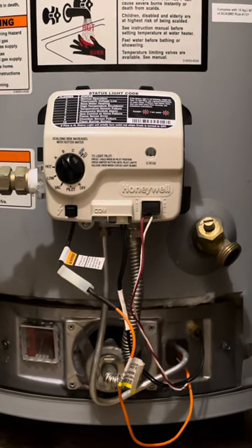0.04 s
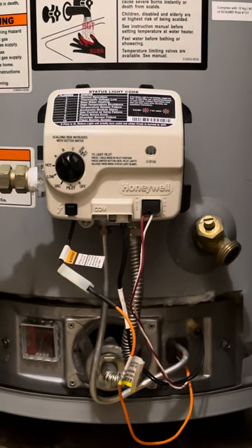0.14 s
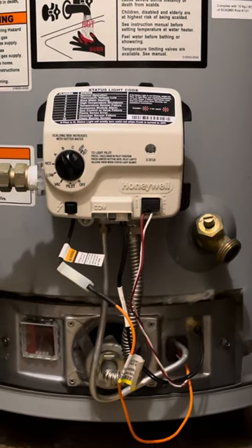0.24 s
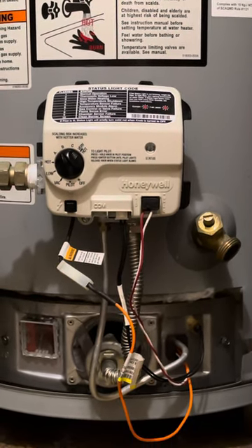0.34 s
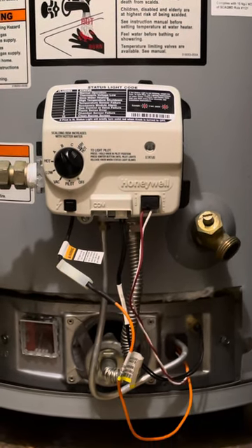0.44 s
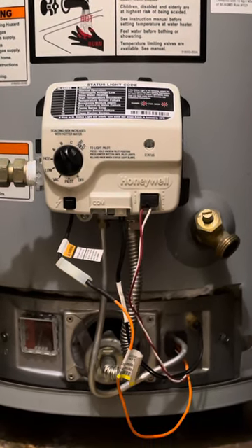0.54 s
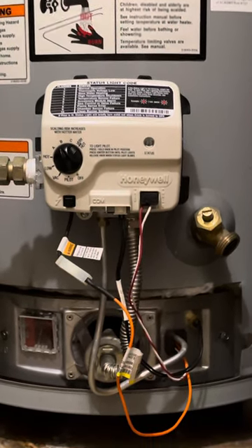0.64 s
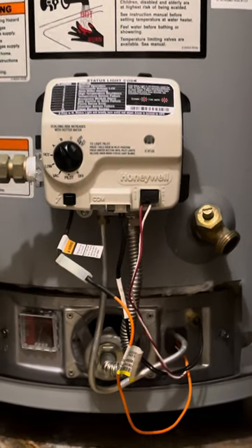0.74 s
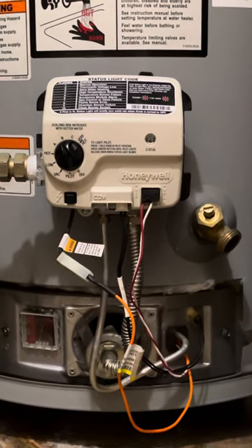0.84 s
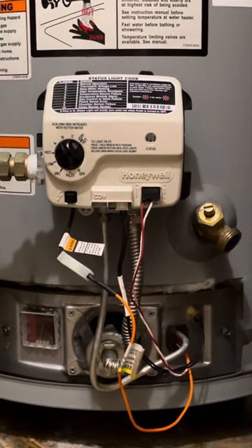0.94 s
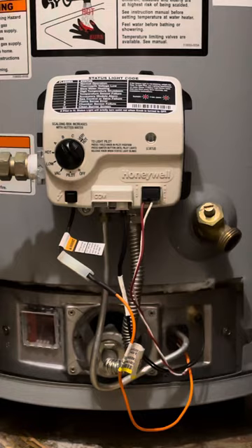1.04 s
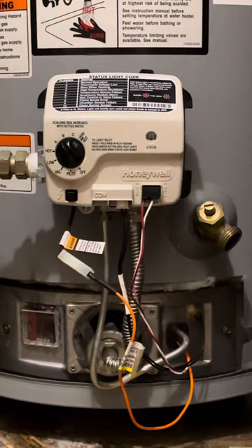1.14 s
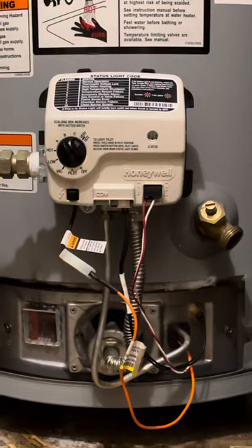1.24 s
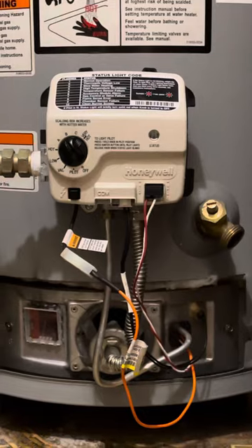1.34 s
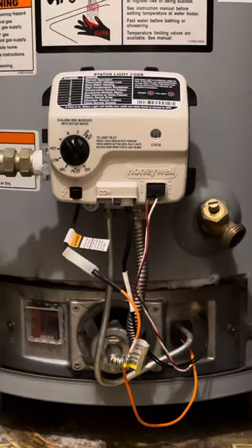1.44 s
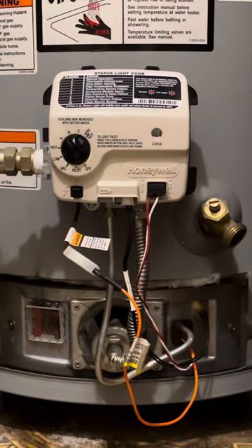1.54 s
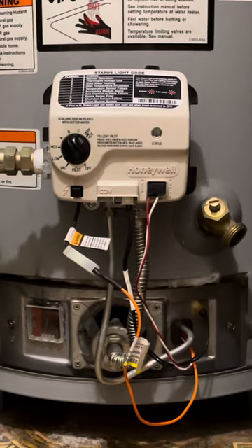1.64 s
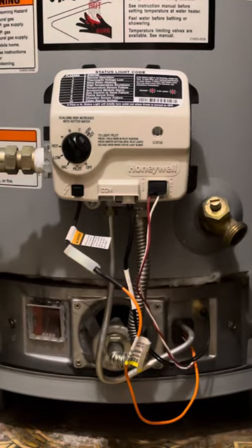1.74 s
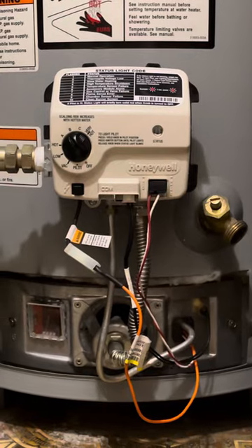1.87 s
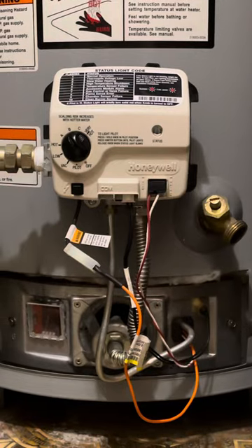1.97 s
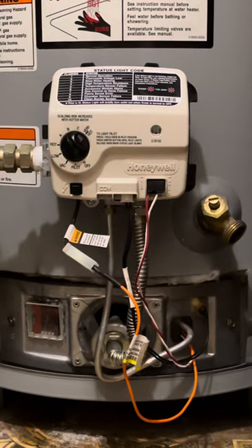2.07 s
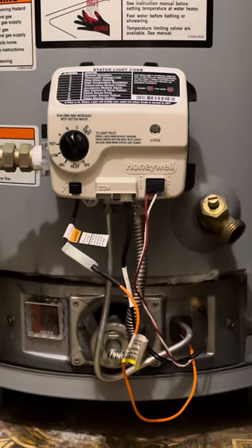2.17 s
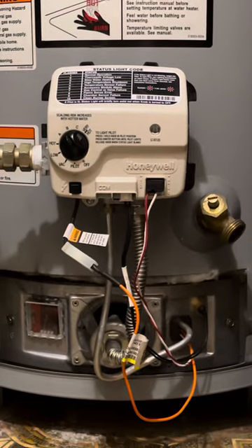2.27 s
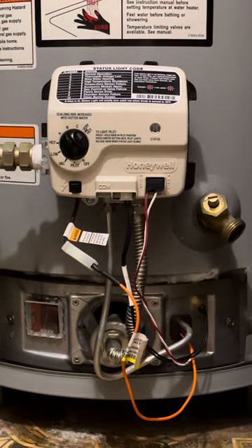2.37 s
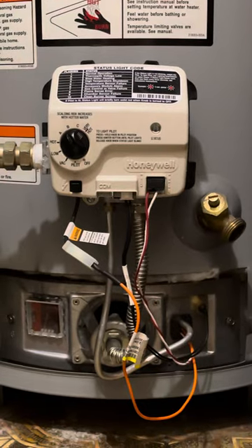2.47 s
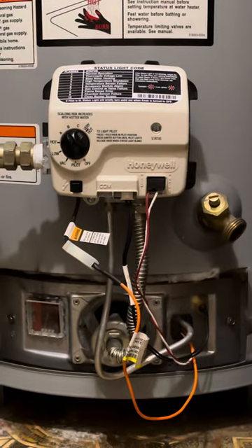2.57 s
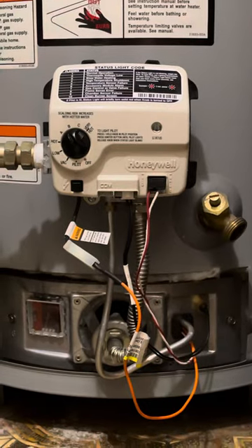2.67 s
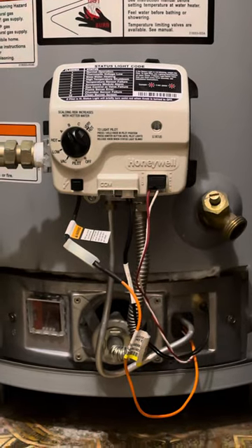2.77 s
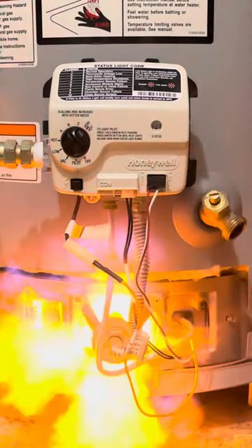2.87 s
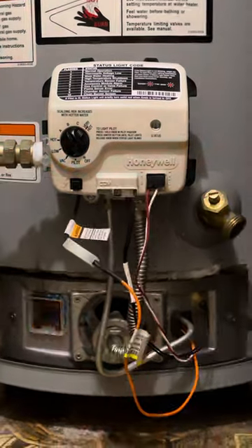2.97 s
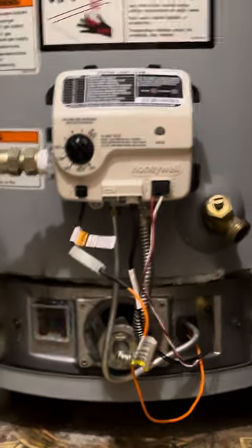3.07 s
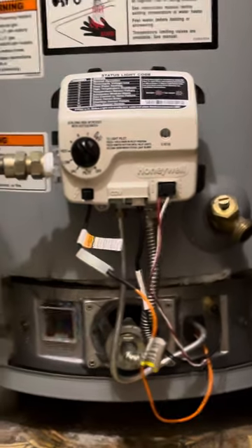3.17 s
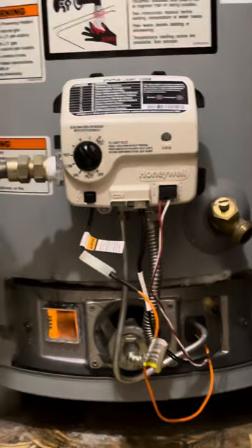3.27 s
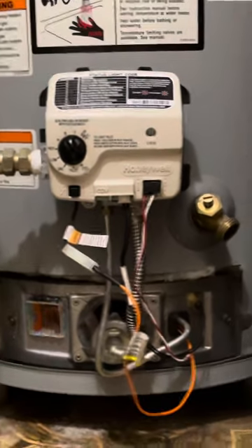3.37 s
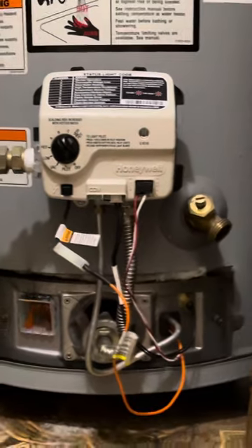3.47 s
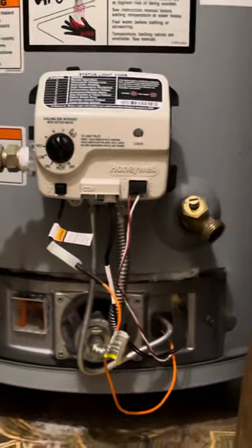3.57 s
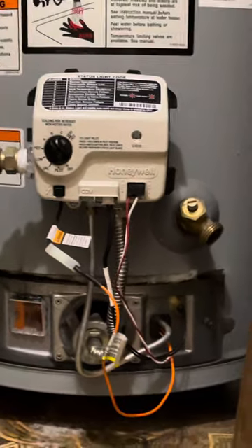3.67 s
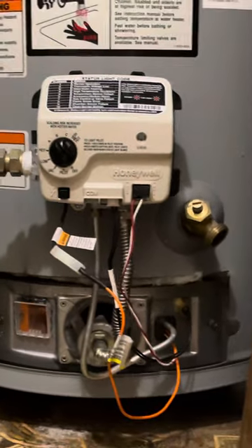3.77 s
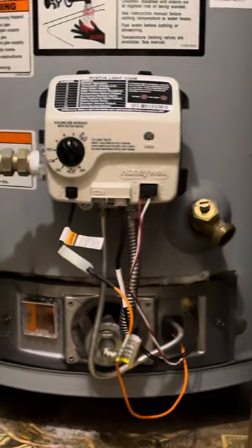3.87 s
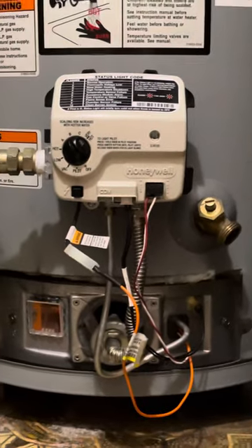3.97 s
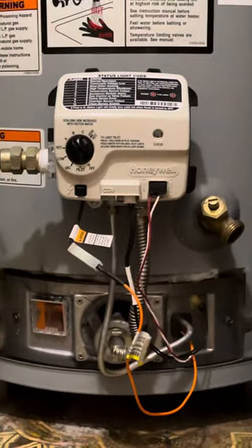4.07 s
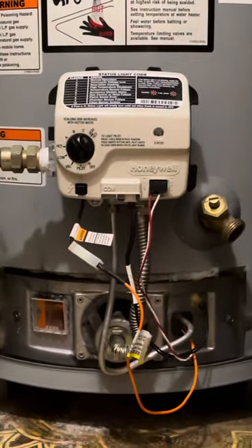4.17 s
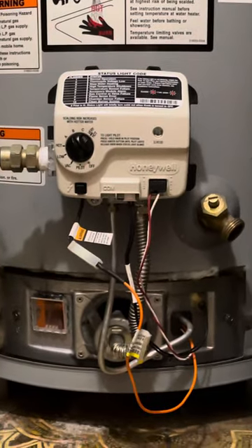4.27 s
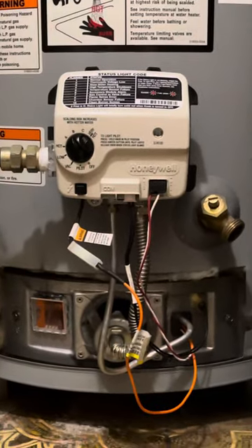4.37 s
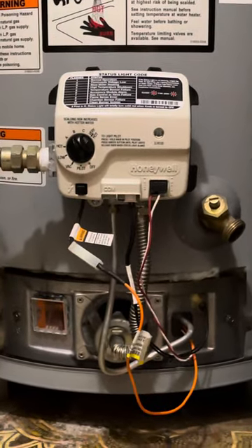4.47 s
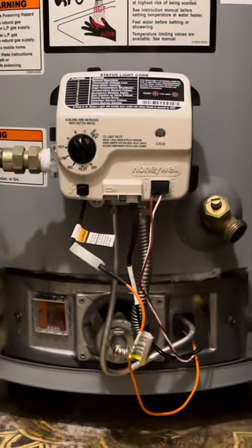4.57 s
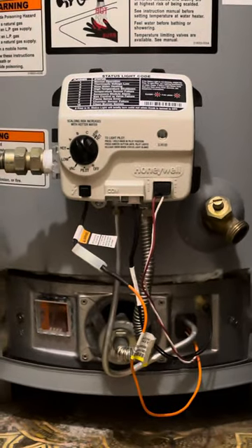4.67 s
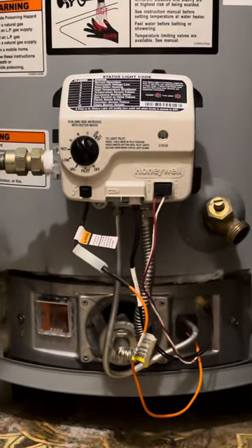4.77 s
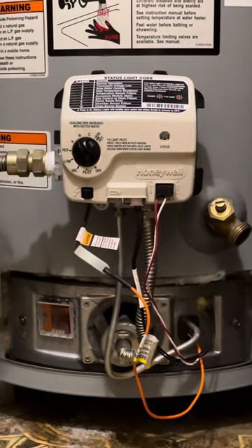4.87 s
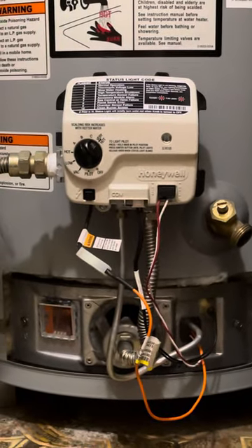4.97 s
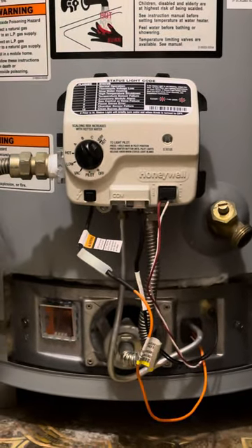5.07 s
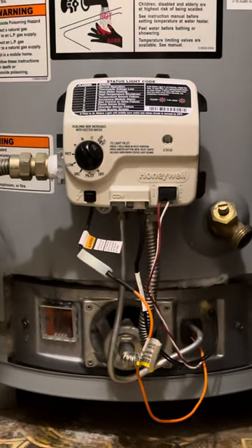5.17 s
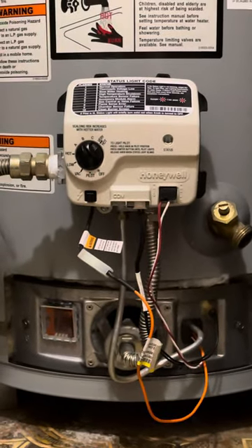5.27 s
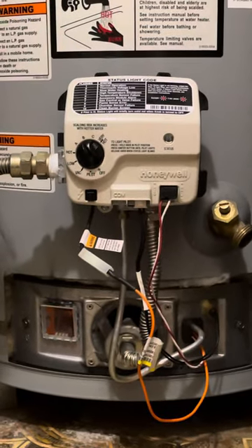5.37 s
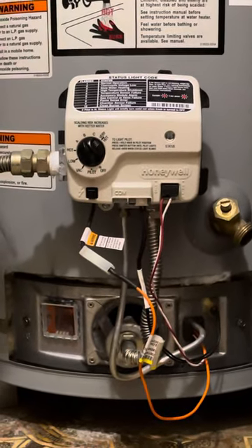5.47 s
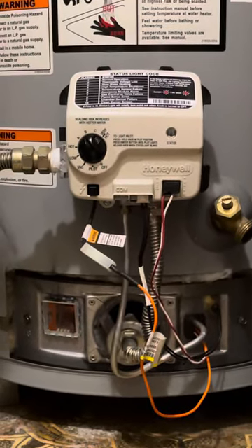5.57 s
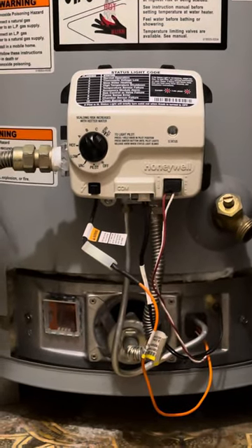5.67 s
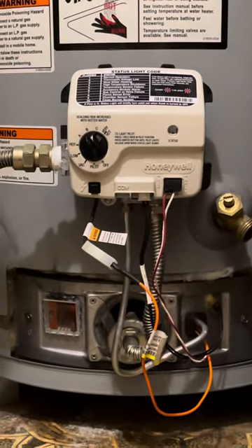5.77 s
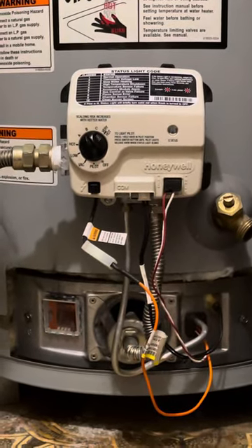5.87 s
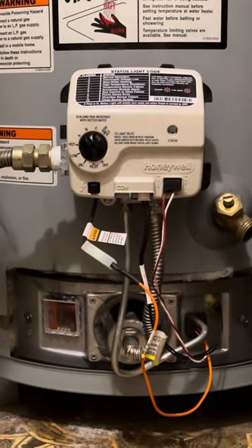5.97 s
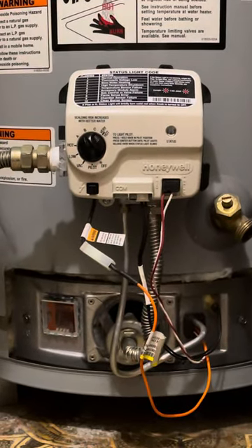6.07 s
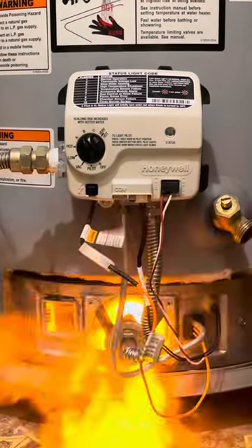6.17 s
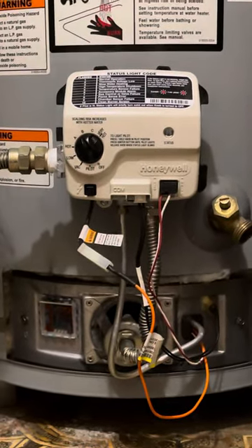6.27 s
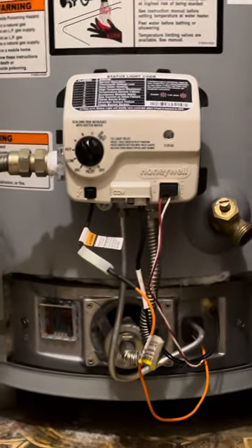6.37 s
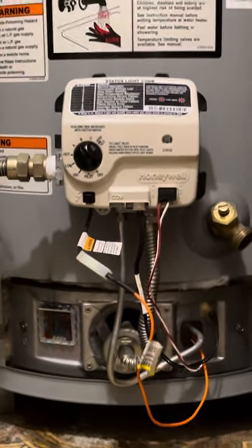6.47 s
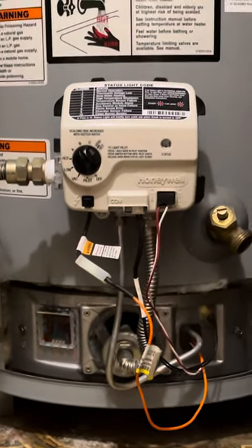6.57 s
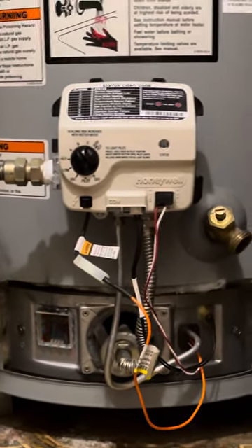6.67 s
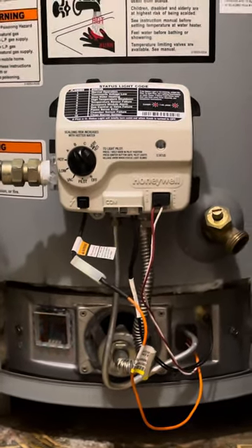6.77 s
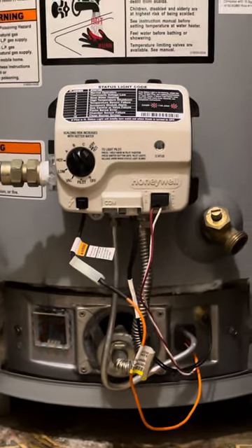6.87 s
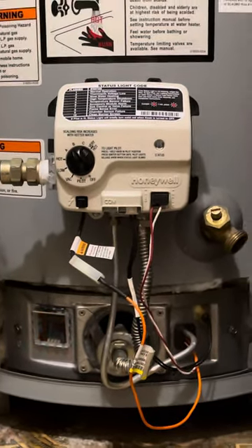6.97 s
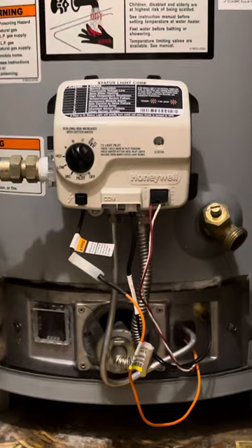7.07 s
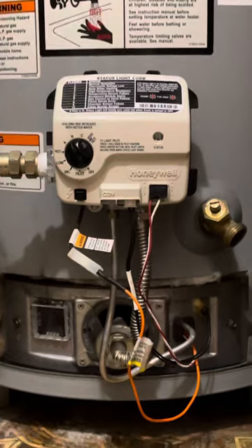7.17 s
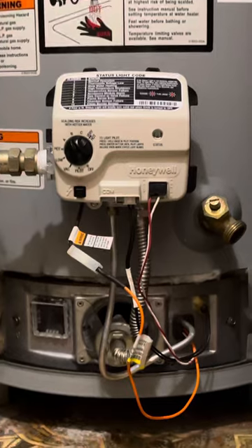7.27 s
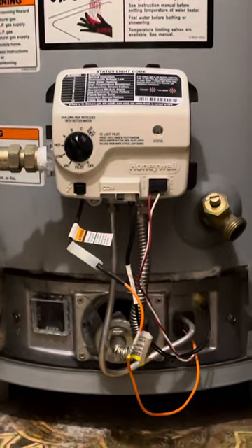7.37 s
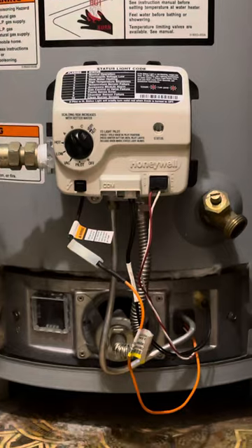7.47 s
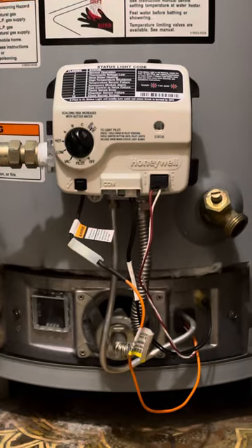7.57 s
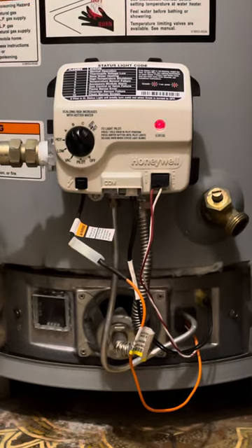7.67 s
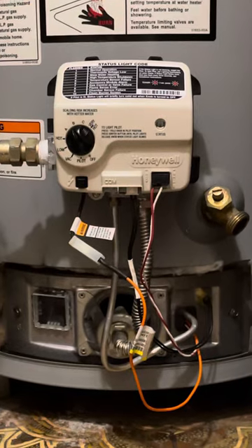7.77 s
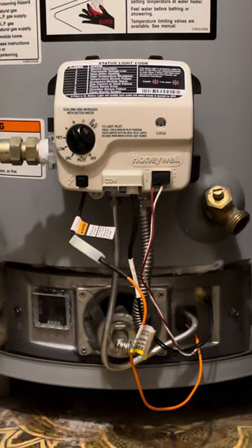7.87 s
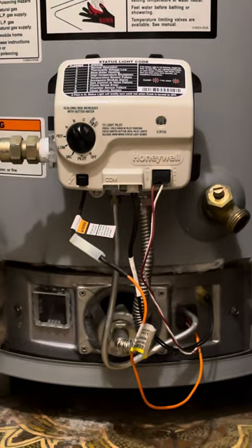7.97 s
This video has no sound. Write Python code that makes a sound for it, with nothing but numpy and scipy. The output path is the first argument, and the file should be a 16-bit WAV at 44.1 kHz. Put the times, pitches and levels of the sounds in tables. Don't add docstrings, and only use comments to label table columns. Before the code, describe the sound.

A water heater burner hisses quietly over a low hum, then two late ignitions bang and boom, each followed by roaring, settling flame.

```python
import sys
import numpy as np
from scipy import signal
from scipy.fft import irfft
from scipy.io import wavfile
from scipy.ndimage import uniform_filter1d

SR = 44100
rng = np.random.default_rng(int(sys.argv[2]) if len(sys.argv) > 2 else 0)


def makeup_ratio(level_db):
    decades = np.asarray(level_db, float) / 20
    return 10 ** decades


def output_pcm(signal):
    pcm = np.clip(np.atleast_2d(signal).T, -1, 1) * 32767
    wavfile.write(sys.argv[1], SR, np.round(pcm).astype(np.int16))


N = 353682
OVERTONE_LOW_HZ, OVERTONE_HIGH_HZ = 128, 219


def evened(x):
    return x / np.sqrt(np.mean(x ** 2) + 1e-20)


def read(points, hz):
    f, value = np.transpose(points)
    return np.interp(np.log(hz + 1), np.log(f + 1), value)


def step(t, width):
    return 1 / (1 + np.exp(np.clip(-t / width, -50, 50)))


def above(x, edge_hz):
    return signal.sosfiltfilt(signal.butter(4, edge_hz, "high", fs=SR, output="sos"), x)


def add(mix, s, sound):
    part = mix[..., round(s * SR):][..., :sound.shape[-1]]
    part += sound[..., :part.shape[-1]]


def noise(colour_db, size, patchy_db, swell_db):
    hop = size // 4
    frames, hz = N // hop + 5, np.fft.rfftfreq(size, 1 / SR)
    a, b, patches = rng.standard_normal((frames, len(hz), 3)).T
    flicker = evened(uniform_filter1d(patches[0], size=3))
    patches = uniform_filter1d(patches, size=8, axis=0)
    patches = evened(uniform_filter1d(patches, size=8, axis=1))
    level_db = colour_db(hz)[:, None] + patchy_db * patches + swell_db * flicker
    z = (a + 1j * b) * makeup_ratio(level_db)
    return evened(signal.istft(z, nperseg=size, noverlap=size - hop)[1][:N])


# f/Hz, level/dB per Hz
HUM = [(35, -38), (60, -18), (79, 3), (97, 1), (114, 0), (135, -10.5), (209, -12.5), (274, -25.5),
       (303, -23), (341, -30), (450, -38), (580, -55), (990, -120)]
# t/s, level/dB
HUM_LEVEL = [(0, -41), (.7, -43.5), (1.5, -43), (2.4, -43.5), (4.5, -42.5), (5.2, -43), (6, -44),
             (7.3, -47), (7.6, -51.5), (8.1, -48)]
# f/Hz, level/dB per Hz
FLUE = [(12, -45), (22, -17), (35, 3.5), (45, 9.5), (58, -2), (68, -10), (90, -48), (200, -140)]
# t/s, level/dB
PUFFS = [
    (.09, -57),
    (.69, -56),
    (.94, -68),
    (1.31, -55),
    (1.78, -63),
    (1.91, -52),
    (2.5, -56),
    (7.3, -70),
]


def hum():
    t = np.arange(N) / SR
    air = noise(lambda hz: read(HUM, hz), size=4096, patchy_db=.5, swell_db=.5)
    flue = noise(lambda hz: read(FLUE, hz), size=4096, patchy_db=0.5, swell_db=-0.6)
    pilot = noise(lambda hz: -30 * np.log2((hz + 1) / 430) ** 2, size=512, patchy_db=1.5, swell_db=1.5)
    flutter = sum(makeup_ratio(db - 220 * np.maximum(t - s, 0)) * step(t - s, .004) for s, db in PUFFS)
    level_db = np.interp(t, *np.transpose(HUM_LEVEL))
    level = makeup_ratio(level_db)
    dulled = makeup_ratio(0.9 * np.minimum(level_db + 44.5, 0))
    air = air - above(air, OVERTONE_LOW_HZ) * (1 - dulled)
    resting_draught = level * makeup_ratio(-14)
    draught = resting_draught + burning(level_db=-27.5, spare_db=6.2, share=1.35)
    return air * level + flue * draught + pilot * flutter


# f/Hz, level/dB per Hz
JET = [(250, -29), (450, -11.5), (1000, -12), (1300, -7), (3200, -15.5), (4900, -8), (7200, -7),
       (10600, -0.5), (11800, -10), (13100, -19), (13500, -61), (14300, -40), (14600, -20), (15700, -24)]
# f/Hz, bandwidth/Hz, level over the jet/dB
TUBE = [(655, 32, 17.5), (1203, 44, 6.5), (1364, 36, 5.5), (1946, 37, 9.5), (2170, 82, 4), (2675, 72, 9),
        (3775, 46, 8), (4096, 26, 10), (4290, 23, 9), (4710, 180, 9), (5240, 75, 12), (5820, 80, 2.5),
        (6180, 28, 9.5), (7980, 100, 8), (10520, 80, 3), (10850, 79, 6)]


def jet():
    def colour_db(hz):
        peaks = sum((makeup_ratio(2 * db) - 1) / (1 + (2 * (hz - f) / width) ** 2) for f, width, db in TUBE)
        tube_db = 10 * np.log10(np.maximum(1 + peaks, .01))
        return read(JET, hz) + tube_db - 60 * (hz < 150)
    return makeup_ratio(-47.5) * noise(colour_db, size=2048, patchy_db=1.67, swell_db=0.26)


# f/Hz, level/dB per Hz
SELF_NOISE = [(40, -45), (200, -2), (400, 23), (800, 21), (1300, 6), (1500, -42)]


def self_noise():
    hiss = makeup_ratio(-72.5) * noise(lambda hz: read(SELF_NOISE, hz), size=1024, patchy_db=2.5, swell_db=4.5)
    return np.array([hiss, -hiss])


def cough(peak_db, hz, rise, t60):
    t = np.arange(SR // 3) / SR
    return makeup_ratio(peak_db - 60 * t / t60) * (1 - np.exp(-t / rise)) * np.sin(2 * np.pi * hz * t) * 1.68


SWING_S = [-.004, -.0016, .0004, .0076]


def bang(build_db, chamber_hz, crack_db, boom_db, t60, modes, crackle, rattle):
    t = np.arange(len(crackle)) / SR - .05
    grow_db = np.interp(t, [-0.021, -0.019, -0.0115, -0.0017], [-40, -19, 0, -14.5 - build_db])
    shut = step(-t - .0024, .0007)
    build = makeup_ratio(build_db + grow_db) * shut * np.cos(2 * np.pi * 102 * np.minimum(t + 0.005, .0004))
    front_s = [-.016, -.0105, -.0085, -.005, -.001, .0005, .004]
    front = makeup_ratio(np.interp(t, front_s, [-45, -27, -10, -3, 0, -9, -55]))
    hiss = crackle * front
    treble_rms = np.sqrt(np.sum(above(hiss, 4000) ** 2) / np.sum(front ** 2))
    door = sum(makeup_ratio(db) * np.cos(2 * np.pi * hz * t) for hz, db in modes) * front
    crack = makeup_ratio(crack_db) * hiss / treble_rms + door
    turns = chamber_hz * t + 1.31 * (1 - np.exp(-np.maximum(t, -.004) / .0025))
    swing_db = np.interp(t, SWING_S, [-33, -15.5, -7, -1]) - 60 * np.maximum(t - .022, 0) / t60
    boom = makeup_ratio(boom_db + swing_db) * np.cos(2 * np.pi * turns)
    casing = rattle * makeup_ratio(np.where(t > 0, -400 * t, 750 * t)) * step(t + 0.047, .003)
    return 1.136 * np.tanh(build + boom) + crack + casing


# crack end t/s, build-up level/dB, chamber f/Hz, crack level/dB, boom level/dB, boom T60/s
BANGS = [
    (2.8497, 2.5, 79.7, -14, 2, 0.089),
    (6.1396, 3.5, 81, -16, 4, 0.048),
]
# f/Hz, level/dB
CRACK = [(300, -2), (700, -38), (1500, -8), (2000, 1), (3300, -16.5), (5600, -4), (8000, -4.5), (10800, -9),
         (12600, -22), (13200, -43), (14500, -36), (15300, -73)]
# f/Hz, level/dB
CLANG = [(300, -2), (700, -2), (1500, -10.5), (3000, -23.5), (6000, -21), (11000, -24), (12800, -41),
         (13400, -68)]
CASING_DB = [-18.5, -19.5]
# f/Hz, level/dB
DOORS = [
    [(960, -16), (1225, -8.5), (2600, -19.5)],
    [(945, -18), (1450, -12.5), (1870, -21)],
]
# t/s, peak level/dB, f/Hz, rise/s, T60/s
COUGHS = [(2.81, -18.5, 155, 0.003, 0.064), (3.036, -14, 84, 0.0091, 0.22), (3.075, -13, 81, 0.0024, .12),
          (3.16, -9.5, 86, 0.0063, 0.15), (3.279, -9, 92.8, 0.0052, 0.22), (3.316, 1.5, 82.4, 0.0039, 0.11),
          (6.097, -27, 128, .004, 0.03), (6.1116, -10, 200, .003, 0.022), (6.364, -8, 83.4, 0.0034, .12),
          (6.45, -9.5, 79.5, 0.0023, 0.11), (3.274, -18.5, 206.5, 0.0091, 0.16),
          (2.907, -8.5, 80, .008, 0.26), (6.193, -12, 79.7, 0.013, 0.54), (2.868, -44, 1655, .004, 0.3),
          (3.105, -25, 188, 0.0048, 0.04), (7.302, -52.5, 333, .01, 0.16)]


def backfires():
    out = np.zeros(N)
    crackle = noise(lambda hz: read(CRACK, hz) - 40 * (hz < 250), size=256, patchy_db=.7, swell_db=1.2)
    rattle = noise(lambda hz: read(CLANG, hz) - 40 * (hz < 200), size=256, patchy_db=2.0, swell_db=2)
    for (s, *blow), modes, casing_db in zip(BANGS, DOORS, CASING_DB):
        at = slice(round(s * SR), round(s * SR) + SR // 3)
        add(out, s - .05, bang(*blow, modes, crackle[at], makeup_ratio(casing_db) * rattle[at]))
    for s, *puff in COUGHS:
        add(out, s, cough(*puff))
    return out


# flame size level/dB, settling rate/dB per s, spare gas t/s, overtone's settling share
AFTERBURN = [
    (1, 16, 0.3, 1.19),
    (1.5, 18.5, 0.47, 1.42),
]


def burning(level_db, spare_db, share):
    gain = np.zeros(N)
    for (s, *_), (size_db, settle_db, spare_s, own_share) in zip(BANGS, AFTERBURN):
        t = np.arange(N) / SR - s
        caught = step(t - 0.037, 0.0064)
        spare = step(spare_s - t, 0.052)
        fall_db = (share or own_share) * settle_db * np.maximum(t, 0)
        gain += caught * makeup_ratio(level_db + size_db + spare_db * spare - fall_db)
    return gain


# f/Hz, level/dB per Hz
RUMBLE = [(12, -49), (20, -25), (44, -16.5), (85, 4), (119, -10.5), (189, -2), (230, -28.5), (268, -36.5),
          (336, -65), (371, -25.5), (400, -43), (520, -55), (880, -120)]
# f/Hz, level/dB per Hz
RUSH = [(150, -27), (250, -5), (279, 5.5), (318, -10.5), (391, -17), (555, -7.5), (604, -11.5),
        (838, -19.5), (1610, -24.5), (2680, -30), (2910, -32), (3170, -35.5), (4500, -35), (5850, -66),
        (9900, -120)]


def flame():
    rumble = noise(lambda hz: read(RUMBLE, hz), size=4096, patchy_db=.6, swell_db=.4)
    rush = noise(lambda hz: read(RUSH, hz), size=512, patchy_db=1.5, swell_db=.8)
    bright = makeup_ratio(np.where(np.arange(N) / SR < BANGS[1][0], 1.5, -1))
    rush = rush + above(rush, 570) * (bright - 1)
    upper = above(rumble, OVERTONE_LOW_HZ)
    overtone = upper - above(upper, OVERTONE_HIGH_HZ)
    low = (rumble - overtone) * burning(level_db=-20, spare_db=-0.16, share=1.01)
    second = evened(overtone) * burning(level_db=-29, spare_db=0.87, share=None)
    return low + second + rush * burning(level_db=-31, spare_db=2.25, share=2.13)


# f/Hz, lead/half turns
PORT_PHASE = [(2000, 0), (3900, .1), (4760, .72), (4900, .97), (4990, 1.05), (5600, 1.96), (6300, 2.03),
              (8100, 2.76), (8450, 2.96), (9540, 3.03), (9700, 3.25), (11500, 3.72), (12000, 3.98),
              (14000, 4), (14500, 4.72)]
# f/Hz, level/dB
PORT_OWN = [(60, -32), (130, -23), (250, -14), (1300, -14), (1600, -19), (2300, -17), (2700, -7),
            (3200, -16), (5200, -18), (5600, -26), (16000, -40)]


def ports(x):
    hz = np.fft.rfftfreq(2048, 1 / SR)
    lead = np.exp(.5j * np.pi * np.interp(hz, *np.transpose(PORT_PHASE)))
    lean = makeup_ratio(.08 / (1 + (hz / 700) ** 2))
    own = makeup_ratio(read(PORT_OWN, hz)) * np.exp(2j * np.pi * rng.random(len(hz)))
    responses = (lead / lean + own, lean / lead - own)
    ears = [np.fft.fftshift(irfft(g)) * np.hanning(2048) for g in responses]
    return signal.oaconvolve(x[None], np.array(ears), "full")[:, 1024:N + 1024]


def scene():
    body_share = .24
    steady = hum() + jet()
    hiss = self_noise()
    blows = backfires()
    airborne = steady + flame() + (1 - body_share) * blows
    return ports(airborne) + body_share * blows + hiss


def low_pass(x):
    return signal.sosfilt(signal.butter(12, 15200, fs=SR, output="sos"), x)


def record(dry):
    power_db = 10 * np.log10(abs(uniform_filter1d((dry ** 2).mean(0), size=800)) + 1e-12)
    duck_db = np.maximum(power_db + 7.0, 0) * 13
    lag, creep = np.exp(-1 / (0.027 * SR)), np.exp(-1 / (.4 * SR))
    for _ in range(4):
        duck_db = signal.lfilter([1 - lag], [1, -lag], duck_db)
    creep_db = signal.lfilter([1 - creep], [1, -creep], duck_db)
    x = dry * makeup_ratio(-duck_db - 0.92 * creep_db)
    x = x - above(x, 12500) * (1 - makeup_ratio(-2.5 * creep_db))
    ceiling = .96
    x = x / (1 + abs(x / ceiling) ** 8) ** (1 / 8)
    return low_pass(x)


dry = scene()
out = record(dry)
output_pcm(out)
```